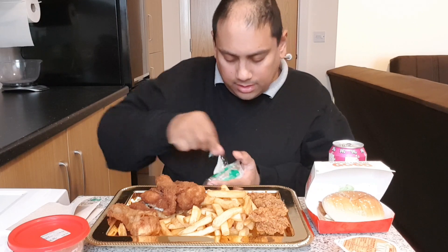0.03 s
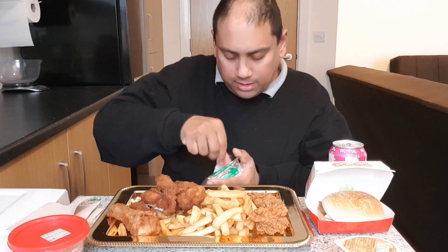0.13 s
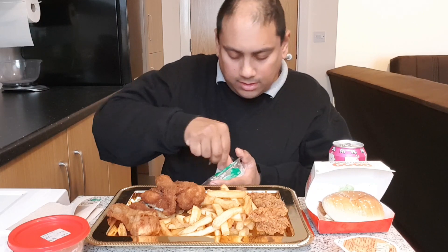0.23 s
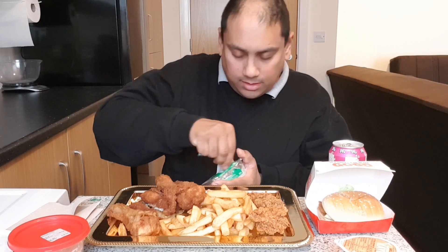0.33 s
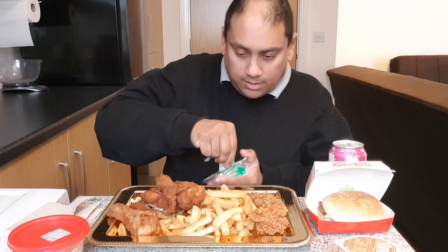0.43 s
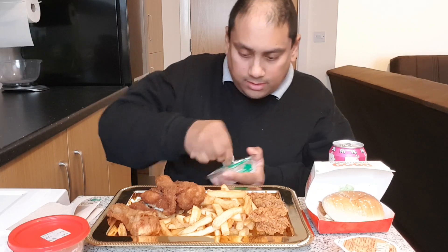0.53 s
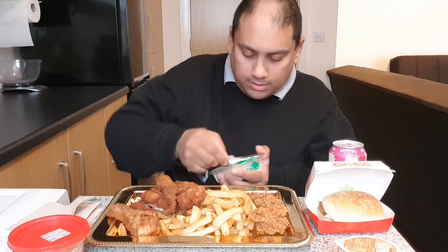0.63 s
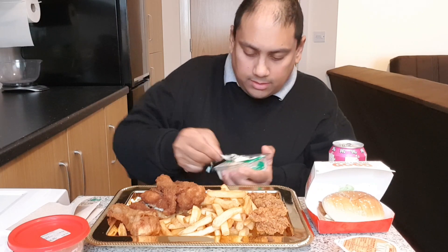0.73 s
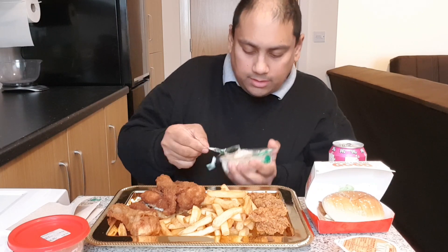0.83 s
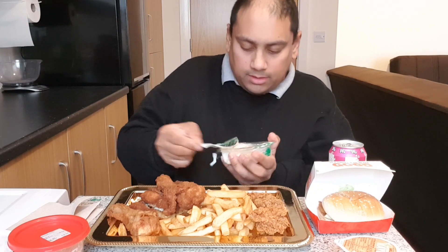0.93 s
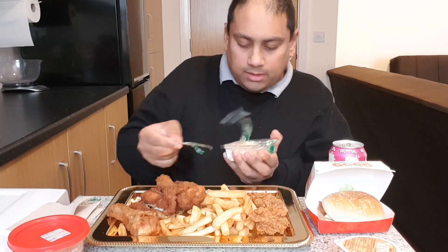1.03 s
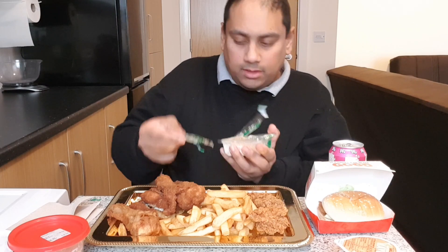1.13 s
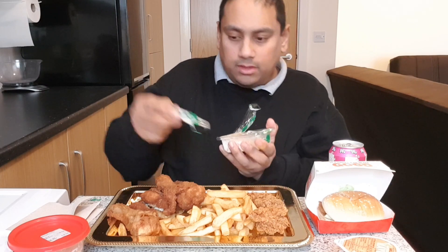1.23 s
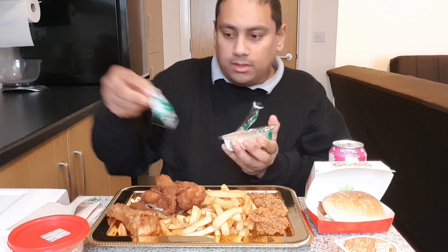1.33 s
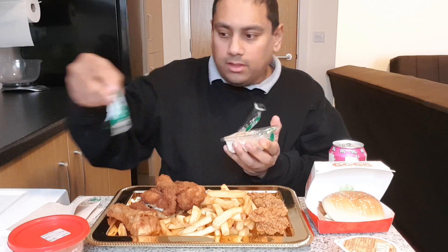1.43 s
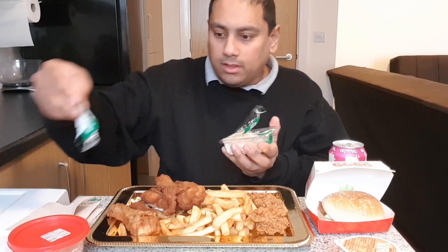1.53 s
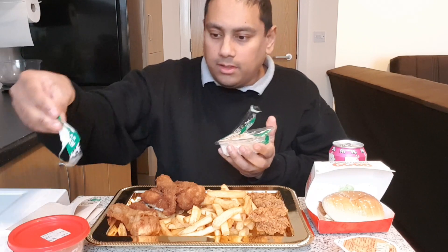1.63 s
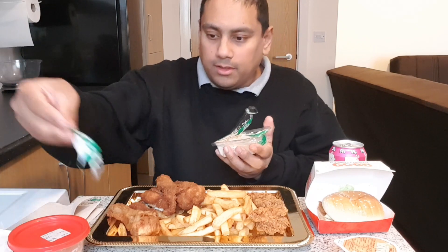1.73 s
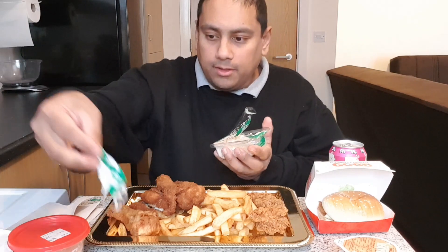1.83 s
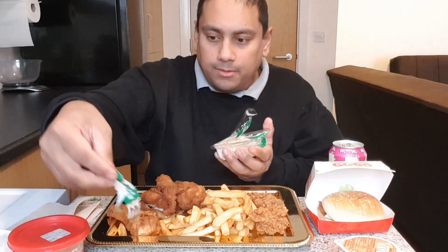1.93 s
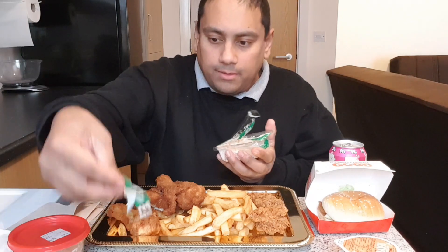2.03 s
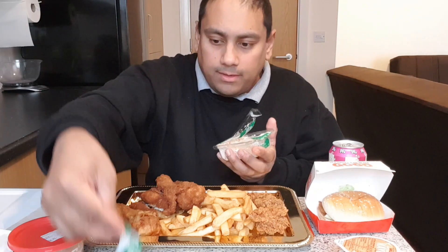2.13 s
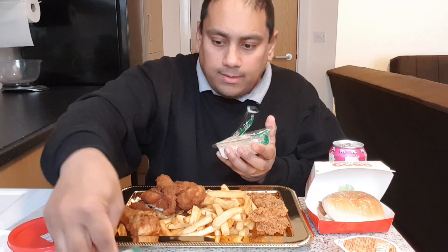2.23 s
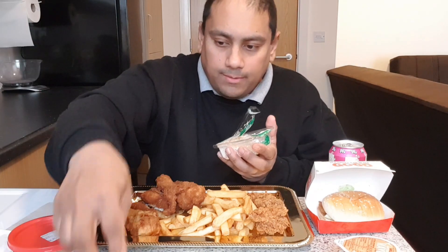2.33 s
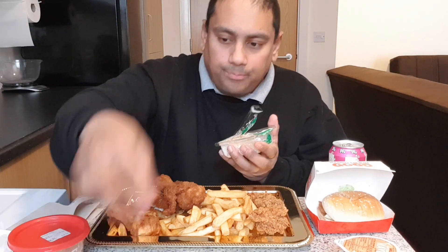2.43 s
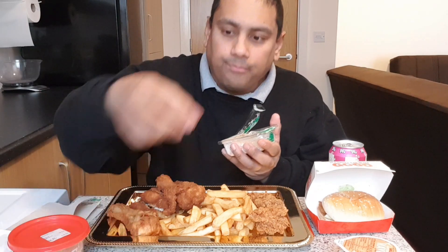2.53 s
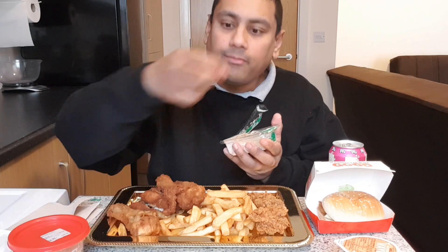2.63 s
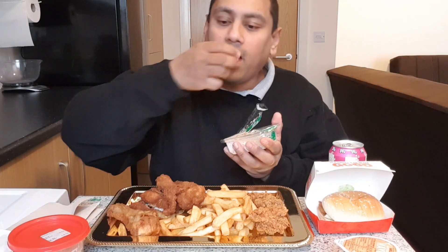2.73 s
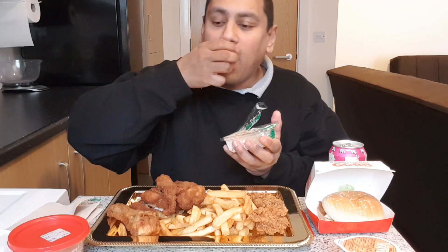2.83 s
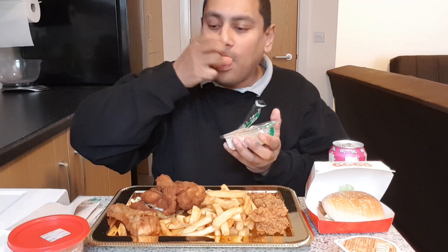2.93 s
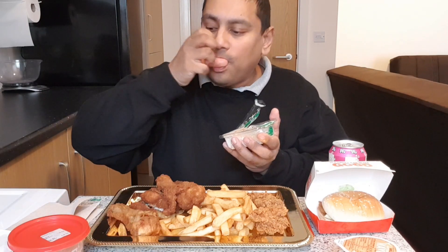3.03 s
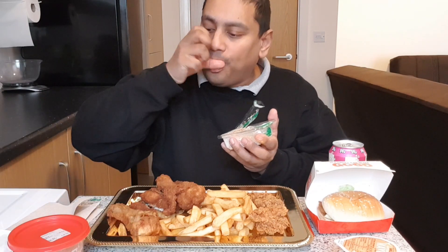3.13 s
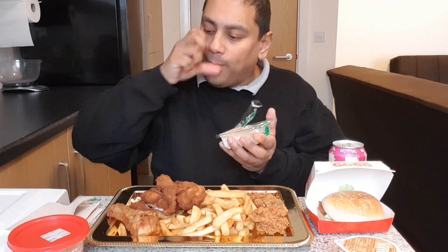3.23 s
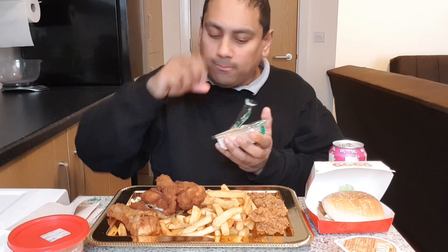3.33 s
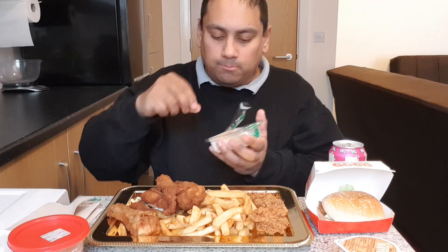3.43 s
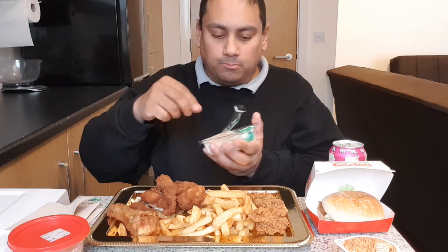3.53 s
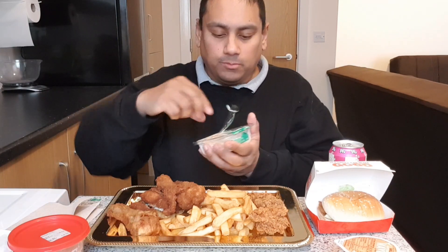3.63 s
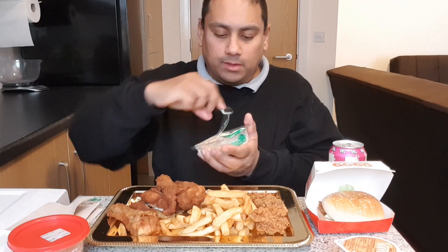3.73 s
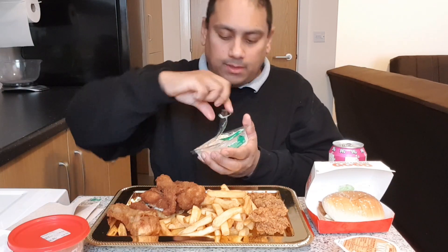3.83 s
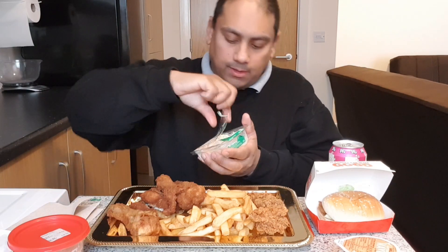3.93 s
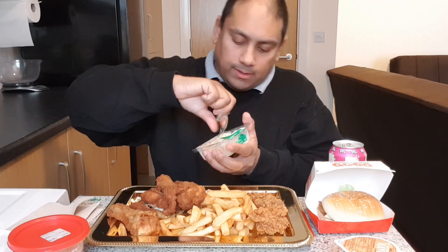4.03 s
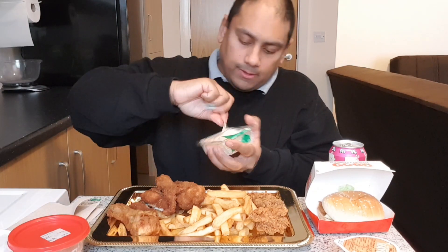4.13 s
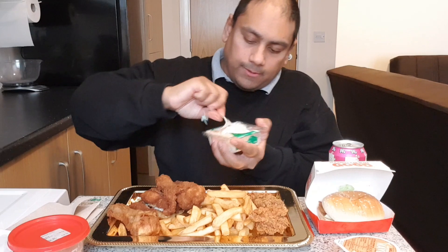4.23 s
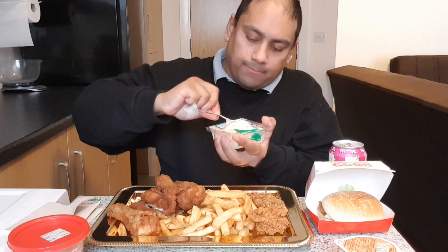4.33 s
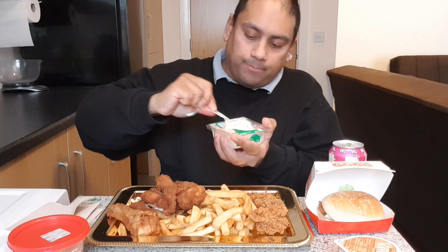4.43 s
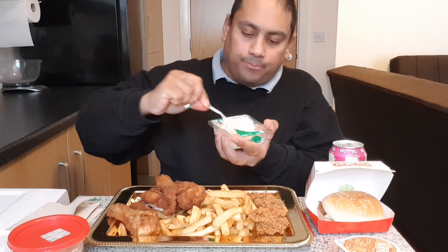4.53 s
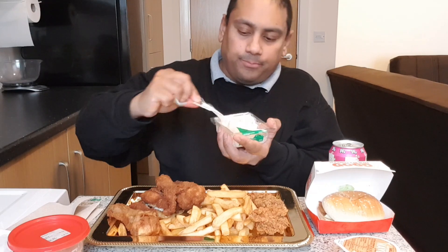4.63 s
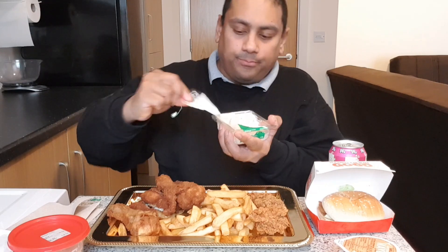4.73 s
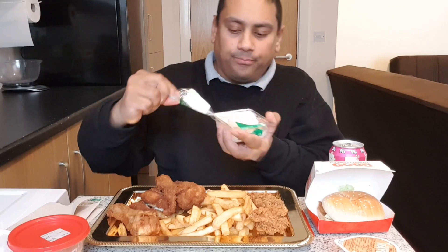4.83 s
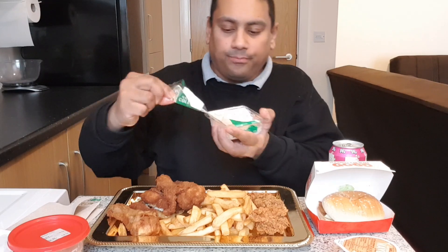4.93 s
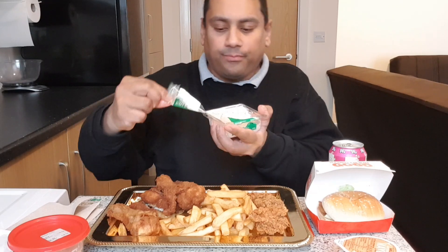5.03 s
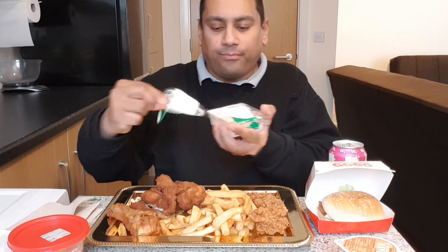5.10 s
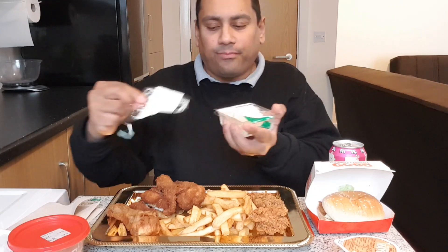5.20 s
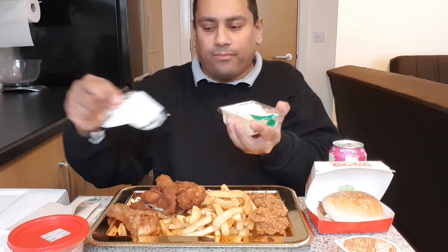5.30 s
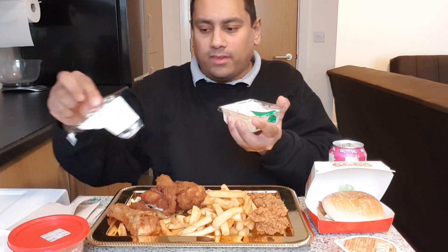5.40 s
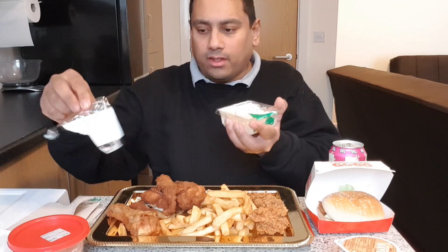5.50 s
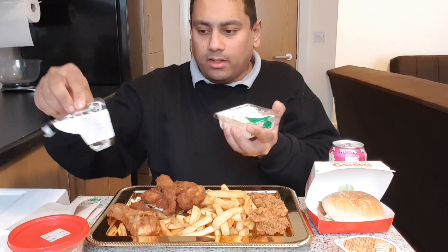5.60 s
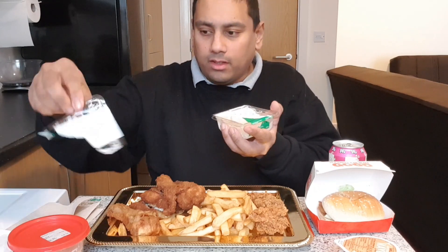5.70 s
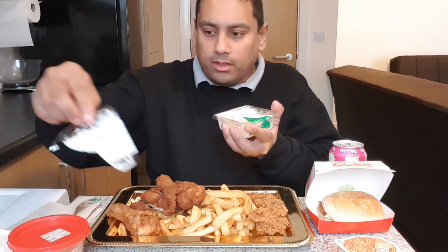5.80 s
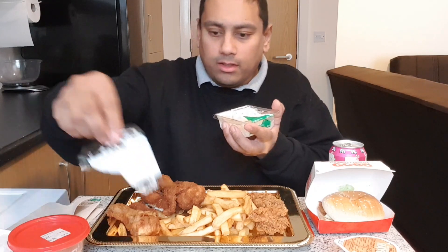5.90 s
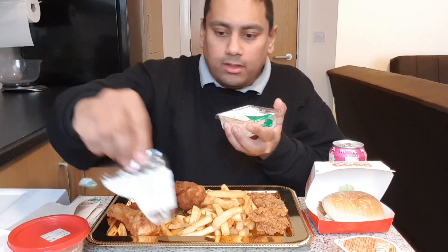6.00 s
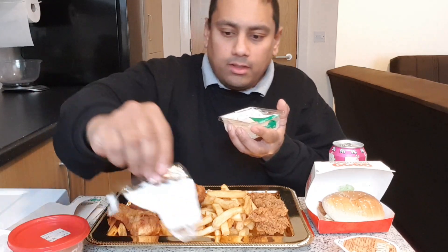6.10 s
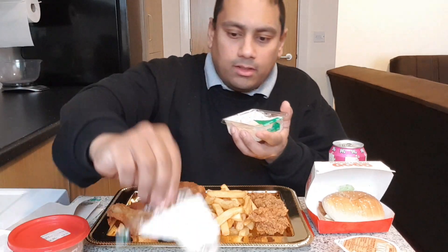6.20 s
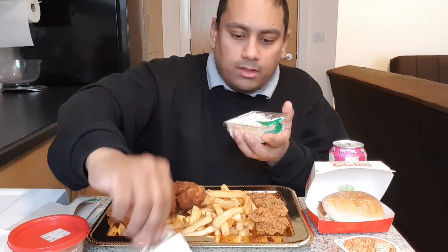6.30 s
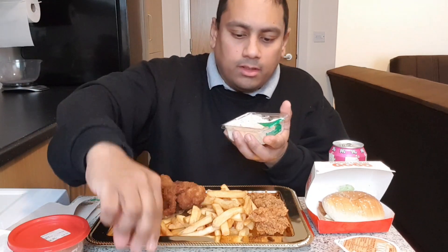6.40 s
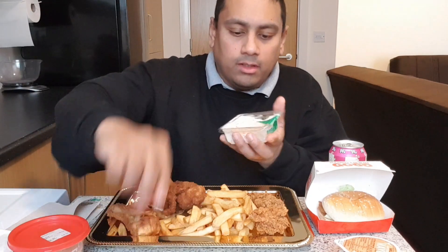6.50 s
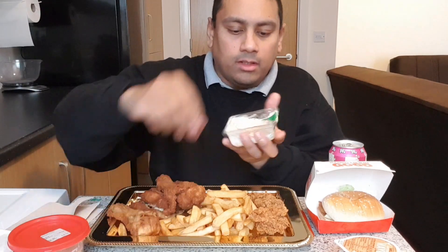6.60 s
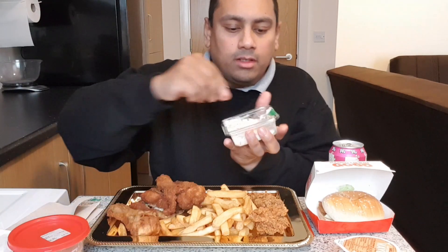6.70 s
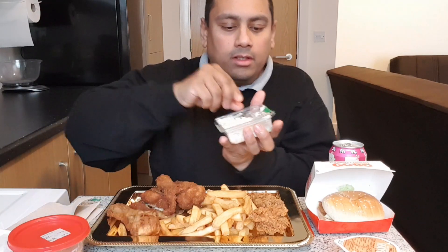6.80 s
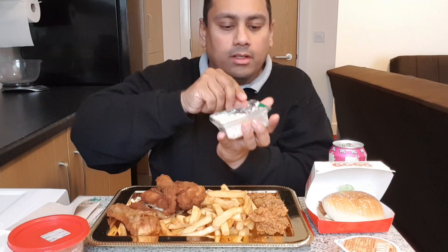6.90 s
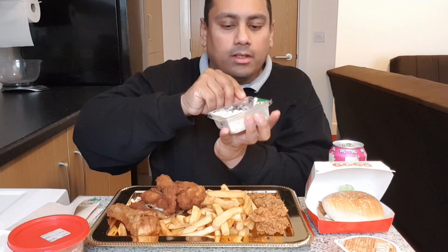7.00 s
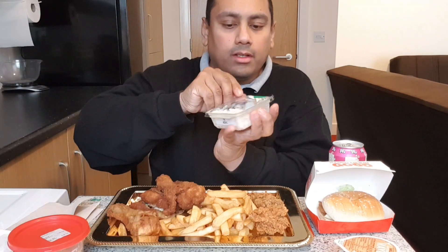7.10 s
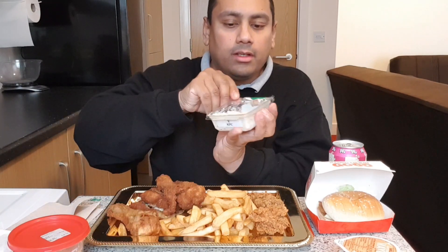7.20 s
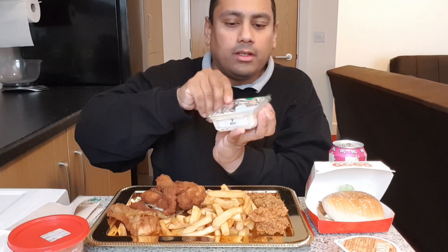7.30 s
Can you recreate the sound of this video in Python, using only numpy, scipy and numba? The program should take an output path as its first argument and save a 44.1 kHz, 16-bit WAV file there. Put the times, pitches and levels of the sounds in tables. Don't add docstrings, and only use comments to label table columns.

```python
import sys
import numpy as np
from scipy import signal
from scipy.fft import rfft, irfft, next_fast_len
from scipy.io import wavfile
from scipy.ndimage import uniform_filter1d
from numba import njit

SR = 44100
rng = np.random.default_rng(int(sys.argv[2]) if len(sys.argv) > 2 else 0)


def undo_db(level):
    steps = np.asarray(level, float) / 20
    return 10 ** steps


def output_pcm(signal):
    pcm = np.clip(np.atleast_2d(signal).T, -1, 1) * 32767
    wavfile.write(sys.argv[1], SR, np.round(pcm).astype(np.int16))


N = 324267

# pitch in Hz, level in dB per Hz.
HUM_COLOUR = [(15, -41.5), (25, -19), (80, -0.5), (108, -11), (141, -3), (161, -16.5), (270, -18),
              (301, -10.5), (405, -21.5), (516, -22), (560, -38.5), (1040, -41.5), (7510, -49),
              (11600, -32), (16000, -39)]
# pitch in Hz, width in Hz, level in dB.
FRIDGE_MODES = [(47.6, 3.44, 2.5), (75.4, 4.8, 2.5), (135.3, 5, -1.5), (190, 22, -5), (295, 1.9, -5),
                (417, 230, -33), (5000, 2500, -35.5)]
# pitch in Hz, likeness from 0 to 1.
HUM_LIKENESS = [(60, 0.98), (130, 0.83), (300, 0.81), (640, 0.6), (1400, 0)]
# time in seconds, rumble above its rest in dB.
THUDS = [(0.1, 4.5), (0.588, 13.5), (0.951, 4.5), (1.21, 5.5), (1.64, 11), (2.292, 11.5), (2.742, 9),
         (3.78, 8.5), (4.89, 15.5), (5.15, 5.5), (6.118, 0.5), (7.19, 4)]
# start in
# seconds, end in seconds, pitch in Hz, width in Hz, level in dB.
SQUEAKS = [(0, .05, 4470, 6040, -65), (1.8, 1.94, 5900, 120, -70), (2.02, 2.17, 5830, 120, -73),
           (2.18, 2.3, 10000, 7000, -62.5), (2.31, 2.41, 2340, 350, -75.5), (2.475, 2.52, 3170, 500, -72),
           (2.46, 2.5, 2380, 500, -73), (2.86, 3.06, 1520, 200, -84), (5.4, 5.505, 11500, 5000, -63),
           (2.4, 2.62, 5520, 5000, -76), (2.645, 2.7, 3600, 893, -79), (5.4, 5.5, 5000, 6040, -64),
           (2.52, 2.67, 12260, 5000, -70.5), (2.79, 2.87, 2400, 400, -73), (2.73, 2.77, 3270, 600, -58),
           (2.8, 2.86, 3200, 600, -74), (2.815, 2.9, 1030, 450, -73), (3.68, 3.74, 9460, 3000, -72),
           (3.77, 3.998, 1480, 160, -78), (6.8, 6.84, 10500, 3990, -70), (6.95, 7.09, 1510, 900, -80),
           (6.98, 7.27, 456, 90, -60), (7.04, 7.09, 4520, 2490, -75), (7.11, 7.19, 1700, 900, -68),
           (7.24, 7.338, 1610, 450, -73), (7.3, 7.33, 11500, 2500, -64)]

# start in seconds, snap level in dB, ring pitch in Hz, ring against the snap in dB.
STRIP_SNAPS = [(0.056, -54.5, 1330, 5), (0.074, -37, 9000, -20), (0.0811, -31.5, 1440, -12.5),
               (0.2803, -37, 1340, -12), (0.524, -33, 1500, 0), (0.5728, -29.5, 1500, 0),
               (0.709, -31.5, 1480, 4.5), (0.717, -34.5, 1510, 1.5), (0.699, -31, 1620, 2),
               (0.939, -41, 1000, -5), (0.955, -23.5, 4700, -27.5), (1.1915, -37, 3200, -17),
               (1.2057, -43, 2920, -14.5), (1.4886, -40, 2920, -21), (1.5955, -41, 2900, -15),
               (1.9645, -30, 3100, -18), (1.474, -33, 2900, -30), (1.5812, -30, 3000, -18),
               (1.661, -36, 2920, -12), (1.7525, -32, 3040, -12), (1.951, -28, 2960, -35),
               (2.6494, -55.5, 3580, -9.5), (2.6798, -44, 12900, 8), (2.7207, -36, 10600, -7),
               (2.727, -42.5, 2330, -2.5), (3.1403, -42.5, 4640, -11)]
# start in seconds, snap level in dB, ring pitch in Hz, ring against the snap in dB.
LID_SNAPS = [(4.0123, -29, 1510, -13.5), (4.1931, -20.5, 6060, -21.5), (4.2244, -31, 1140, 0.5),
             (4.2255, -36, 2700, -2), (4.3002, -22.5, 5000, -9.5), (4.4534, -29, 3510, -10),
             (4.5945, -16, 2640, -12), (4.7444, -33.5, 1740, 8), (4.8686, -25, 3050, -29),
             (5.0103, -49, 11300, 2), (5.2037, -23, 9050, -26), (5.215, -23.5, 2930, -13),
             (5.508, -26, 2670, -16), (5.5125, -31, 11700, -3), (5.5777, -25, 2930, -13.5),
             (3.745, -55, 2800, -12.5), (5.9404, -43.5, 2630, -12), (6.8132, -51.5, 700, -27),
             (7.0997, -42.5, 1997, -10)]
# start in seconds, snap level in dB, ring pitch in Hz, ring against the snap in dB.
SHARP_CRACKS = [(0.3552, -33.5, 1410, 10.5), (0.4024, -31, 1760, -2), (0.4122, -4.5, 1500, -9),
                (2.169, -40, 5700, -1.5), (2.4577, -57, 3200, 6.5), (2.695, -56, 5070, 17.5),
                (2.722, -43, 3286, -9), (4.0278, -20, 6300, -44.5), (4.0766, -27, 2290, -10),
                (4.1425, -27.5, 5810, -10), (4.3712, -21.5, 980, -13.5), (4.408, -12, 3660, -5.5),
                (4.4995, -16, 3700, -4.5), (4.5496, -20, 3480, -4.5), (4.6441, -18, 5500, -13),
                (4.678, -33, 5540, -4), (4.7076, -8.5, 5740, -10.5), (4.9158, -37.5, 3100, 2.5)]
# start in seconds, snap level in dB, ring pitch in Hz, ring against the snap in dB.
LOOSE_CRACKS = [
    (5.0862, -50, 5500, 1),
    (5.1054, -17, 990, -29),
    (5.111, -25, 11500, 0),
    (5.126, -33, 11100, 2),
    (5.2283, -19.5, 2940, -35),
    (5.2988, -21, 2440, -11),
    (5.3118, -19.5, 2340, -25),
    (5.36, -23.5, 2950, -16.5),
    (5.5142, -29, 9050, -8),
    (5.5965, -19.5, 2860, -23),
]
# start in seconds, snap level in dB, ring pitch in Hz, ring against the snap in dB.
DRY_TICKS = [(5.7545, -32.5, 2880, -14), (5.833, -38, 6000, -13), (5.7804, -44, 2680, -3),
             (5.7934, -34.5, 11400, -5), (5.8409, -27.5, 12100, -4.5), (5.8616, -39.5, 2280, 2),
             (5.9545, -29, 1740, -12), (5.9897, -50, 1732, 2), (6.042, -33.5, 6500, -14),
             (6.0515, -43.5, 2850, 0.5), (6.092, -37, 1730, -21), (6.1445, -27, 3120, -13),
             (6.2041, -29, 5860, -12), (6.2301, -29.5, 5200, -5), (6.2527, -43, 6050, -7),
             (6.268, -37.5, 3680, -6), (6.2906, -25.5, 3270, -19), (6.3085, -17, 2530, -23),
             (6.317, -16.5, 2500, -15), (6.3487, -20, 3110, -18), (6.93, -49.5, 1716, -12),
             (7.1558, -30.5, 12000, -3.5), (5.966, -43, 4500, 0), (6.0807, -49.5, 2870, 3)]
# start in seconds, snap level in dB, ring pitch in Hz, ring against the snap in dB.
TAPS = [
    (2.172, -61, 1670, 4.5),
    (2.201, -65, 700, -3),
    (2.203, -63, 380, 8),
    (2.241, -49.5, 790, -2.5),
    (2.245, -60.5, 257, 14),
    (2.801, -59, 1200, 6.5),
]
# start in seconds, snap level in dB, ring pitch in Hz, ring against the snap in dB.
FLICKS = [(4.1492, -24.5, 11000, -3), (4.3695, -21.5, 8500, -4.5), (4.415, -27, 3900, 2.5),
          (4.4265, -31, 3200, 0.5), (4.451, -32, 3000, 1), (4.458, -30.5, 3700, 2), (4.468, -29, 3800, 3),
          (4.506, -27, 3800, 2.5), (4.7446, -23.5, 3350, -3), (4.751, -30.5, 1800, 3),
          (4.725, -26.5, 6900, 4), (4.595, -20, 5500, -3.5), (0.575, -32, 1300, 5), (0.63, -30, 1100, 5),
          (0.64, -27.5, 1500, 3.5), (0.59, -29, 1500, 1), (0.778, -35.5, 450, 6), (0.8, -28, 2200, -10),
          (2.7275, -41, 2700, -3), (2.797, -51, 2350, 7), (2.683, -53, 5200, 0), (2.2415, -40, 5400, -4),
          (6.305, -29.5, 6000, -4), (7.1005, -47.5, 1120, 0.5), (4.232, -32, 1170, -1)]

# pitch in Hz, time to fall 60 dB in seconds, level in dB.
ROOM_BANDS = [(322, 0.41, -17.5), (1000, 0.29, -3), (3040, 0.24, 1.5), (6660, 0.32, 3), (13720, 0.11, 13)]
# start in seconds, end in seconds, pitch in Hz, width in Hz, level in dB.
PATCHES = [(.575, .63, 1100, 250, -43), (.62, .7, 1590, 150, -46), (.73, .83, 1030, 248, -42.5),
           (.74, .86, 2150, 710, -44), (.77, .8, 444, 91.6, -45.5), (.76, .9, 12300, 5000, -67),
           (.935, 1.0, 476, 110, -50), (.97, 1.08, 11700, 5000, -51), (.06, .2, 1230, 598, -62.5),
           (.41, .46, 2904, 1503, -46.5), (.412, .44, 446, 120, -42), (.52, .57, 1510, 250, -49),
           (.93, 1.03, 1100, 700, -49), (.93, .96, 3500, 3000, -49), (2.2, 2.3, 496, 600, -70),
           (.42, .5, 635, 249.4, -62), (.58, .7, 655, 249, -52), (1.2, 1.25, 2940, 220, -60.5),
           (1.485, 1.525, 2900, 350, -54.5), (1.585, 1.625, 2920, 350, -54), (1.67, 1.73, 2650, 300, -56.5),
           (1.76, 1.8, 2850, 350, -56), (1.955, 2.05, 3070, 200, -66), (2.728, 2.775, 2300, 900, -55),
           (5.205, 5.27, 2900, 301, -55), (4.225, 4.29, 1070, 303, -57), (4.31, 4.345, 4750, 894, -43.5),
           (4.32, 4.4, 1000, 251, -52), (4.42, 4.435, 3120, 696, -51), (4.45, 4.475, 3520, 704, -44),
           (4.43, 4.48, 1610, 496, -50.5), (4.5, 4.54, 3790, 500, -41.5), (4.6, 4.64, 2700, 700, -51),
           (4.75, 4.81, 1610, 602, -54), (4.87, 4.96, 2920, 500, -60), (5.62, 5.78, 2780, 350, -66.5),
           (5.72, 5.76, 1320, 300, -66), (5.95, 6.0, 2960, 1500, -60.5), (5.99, 6.11, 1700, 300, -70),
           (6.04, 6.1, 2850, 400, -77)]

# full pull reached
# in seconds, held in seconds, film rustle in dB, fade in dB per second, strain on the tub wall against the
# rustle in dB.
STRIP_TUGS = [(0.103, 0.0056, -46.5, 130, 12), (0.3, 0.014, -65.5, 130.5, 12),
              (0.368, 0.002, -40.5, 606, -2), (0.424, 0.0018, -33, 268.5, -14),
              (0.53, 0.076, -43.5, 98, -9), (0.6, 0.068, -42, 200, 18.5), (0.721, 0.045, -35.5, 140, 8.5),
              (0.778, 0.031, -35, 263, 11), (0.956, 0.037, -36.5, 195, -25), (1.209, 0.004, -61, 128, -16),
              (1.491, 0.0056, -48.5, 244, -2), (1.599, 0.0055, -52.5, 204, 6.5),
              (1.679, 0.0094, -47, 203, -4), (1.768, 0.0056, -52, 186, 5), (1.962, 0.005, -47, 204, 2),
              (2.18, 0.039, -62.5, 132, -27), (2.74, 0.004, -64, 137, -32), (2.83, 0.0091, -88, 137, 13),
              (3.154, 0.004, -52, 204.5, 2.5)]
# full pull reached in seconds, held in seconds, film rustle in dB,
# fade in dB per second, strain on the tub wall against the rustle in dB.
LID_TUGS = [(4.035, 0.0035, -44, 106, -8), (4.12, 0.1, -49, 100, 8.5), (4.236, 0.0026, -39, 300, -12),
            (4.32, 0.004, -38.5, 122, -10), (4.418, 0.004, -35, 125, 6), (4.46, 0.0091, -42, 150, -5),
            (4.51, 0.055, -38, 119.5, -2), (4.599, 0.0032, -37.5, 148.7, -6), (4.655, 0.028, -42.5, 150, 7),
            (4.715, 0.004, -36.5, 199.5, 0), (4.747, 0.0017, -32, 190, 4.5), (4.88, 0.03, -45.5, 190, -4),
            (5.12, 0.0033, -35, 387, 6), (5.22, 0.066, -52.5, 127, 11), (5.527, 0.0025, -47, 300, 2),
            (5.591, 0.0033, -40, 293, -1), (5.64, 0.004, -61, 140, -9), (5.72, 0.36, -65.5, 100, 3),
            (6.24, 0.08, -55.5, 108, 5), (6.317, 0.0025, -43, 212, -30), (6.951, 0.23, -82, 59.6, -14.5),
            (7.114, 0.0022, -53.5, 247, 11), (7.249, 0.006, -65, 123, -1)]
# start in seconds, stretched film ring against the rustle in dB, tub air against the rustle in dB.
HOLDS = [(0, 3.5, -6.5), (0.345, 7, -1.1), (0.48, 0, -5.5), (0.9, -2.5, -8.5), (1.07, 4, -13.5),
         (2.12, -23, -11), (2.7, -2, -14), (3, -23.5, -23), (3.95, -6.5, -16), (4.36, 14, -15.5),
         (4.48, 12.5, -17.5), (4.63, -0.5, -17.5), (4.73, 10.5, -14), (5.06, 3.5, -22), (5.65, 1, -2),
         (6.2, -6, -37), (6.85, -23.5, 15), (7.09, -23, 1)]
# time in seconds, pitch in Hz.
FILM_PITCH = [(0, 2860), (1.19, 3040), (1.4, 2765), (1.48, 2920), (1.9, 2737), (1.95, 3020), (2.2, 2990),
              (2.35, 2400), (2.75, 2464), (4, 2740), (4.4, 3390), (4.58, 3770), (4.72, 3800), (4.76, 2380),
              (4.88, 2850), (7.4, 3065)]
# time in seconds, pitch in Hz.
WALL_PITCH = [(0, 1270), (.55, 1402), (.66, 1700), (.85, 1290), (1.1, 1030), (2.85, 1032), (4.2, 999),
              (5.3, 1000), (7.4, 1500)]
# pitch in Hz, level in dB.
FILM_COLOUR = [(300, -37.5), (800, -10.5), (1500, -5), (3000, -4), (5500, 0.5), (7000, -4), (11500, 0),
               (16000, -7.5)]
# start in seconds, end in seconds, share from 0 to 1.
DANGLES = [
    (1.154, 2.152, 1),
    (4.386, 4.85, 0.29),
    (5.16, 5.4, 0.38),
    (5.564, 6.002, 0.6),
]
# pitch in Hz, left minus right in dB.
MIC_LEAN = [(60, -3), (110, 1), (200, 1.5), (380, 0.5), (700, 4), (1290, 0), (2380, 3), (4400, -1.5),
            (8120, 0), (15000, 1)]


def colour(x, points):
    hz, db = np.transpose(points)
    size = next_fast_len(x.shape[-1])
    log_hz = np.log(np.arange(size // 2 + 1) * SR / size + 1)
    gain = undo_db(np.interp(log_hz, np.log(hz), db))
    return irfft(rfft(x, size) * gain, size)[..., :x.shape[-1]]


def unit(x):
    return x / np.sqrt(np.mean(x ** 2))


def along(table):
    s, value = np.transpose(table)
    return np.interp(np.arange(N) / SR, s, value)


def span(a, b, edge_s):
    return np.interp(np.arange(N) / SR, [a - edge_s, a + edge_s, b - edge_s, b + edge_s], [0, 1, 1, 0])


def walk(rate):
    k = int(SR / rate)
    steps = np.repeat(rng.standard_normal(N // k + 1), k)
    return unit(uniform_filter1d(uniform_filter1d(steps, k), k)[:N])


@njit
def svf(x, hz, width):
    y, band, low = np.empty(len(x)), 0., 0.
    for i in range(len(x)):
        g, k = np.tan(np.pi * hz[i] / SR), width / hz[i]
        v = (band + g * (x[i] - low)) / (1 + g * (g + k))
        band, low, y[i] = 2 * v - band, low + 2 * g * v, k * v
    return y


def ring(x, hz, width_hz):
    return np.array([svf(side, hz + np.zeros(len(side)), 1. * width_hz) for side in x])


def double_ring(x, hz, width_hz):
    return ring(ring(x, hz, width_hz), hz, width_hz)


def ticks(size, rate, spread_db):
    happens, sign, strength, spot = rng.random((size, 4)).T
    size_db = np.minimum(-spread_db * np.log(1 - strength), 12.)
    left = (happens < rate / SR) * np.sign(sign - .5) * undo_db(size_db)
    shift = np.round(9 * (spot - .5)).astype(int)
    place = np.clip(np.arange(size) + shift, 0, size - 1)
    return np.array([left, np.bincount(place, left, size)])


def stick_slip_rings(table, rate, spread_db, edge_s):
    rub, out = ticks(N, rate, spread_db) * undo_db(2.0 * walk(30)), np.zeros((2, N))
    drift = 1 + .015 * walk(12)
    for a, b, hz, width, db in table:
        part = slice(max(int((a - edge_s) * SR), 0), int((b + edge_s) * SR))
        gone = np.linspace(-.5, .5, len(drift[part]))
        pitch = hz * drift[part] * (1 - 0.031 * gone)
        tone = unit(double_ring(rub[:, part], pitch, width))
        out[:, part] += undo_db(db - 4 * gone) * span(a, b, edge_s)[part] * tone
    return out


def fridge_and_hiss():
    noise = rng.standard_normal((2, N))
    modes = sum(undo_db(db) * unit(double_ring(noise, hz, 2 * width)) for hz, width, db in FRIDGE_MODES)
    mid, side = undo_db(-2.0) * unit(colour(noise[:, ::-1], HUM_COLOUR)) + undo_db(-2.5) * unit(modes)
    mid = colour(mid, [(hz, 10 * np.log10(1 + np.clip(c, 0, .99))) for hz, c in HUM_LIKENESS])
    side = colour(side, [(hz, 10 * np.log10(1 - np.clip(c, 0, .99))) for hz, c in HUM_LIKENESS])
    t, rise_s, fall_s = np.arange(N) / SR, 0.13, 0.077
    thud_db = sum(db * np.exp(np.minimum((t - s) / rise_s, (s - t) / fall_s)) for s, db in THUDS)
    mid = mid + (undo_db(thud_db - 4.5) - 1) * colour(mid, [(90, -7.0), (160, -12.0)])
    mid = mid * undo_db(0.6 * walk(3.01))
    return undo_db(-54.5) * np.array([mid + side, mid - side]) / mid.std()


def finger_squeaks():
    return stick_slip_rings(SQUEAKS, rate=1400, spread_db=2.0, edge_s=0.025)


def snaps():
    length, settle_s, bounce_s = 4096, 0.0069, 0.001
    direct, thrown, t = np.zeros((2, N + length)), np.zeros(N + length), np.arange(length) / SR
    treble = signal.butter(N=2, Wn=2500, btype="high", fs=SR, output="sos")
    # rows, (thrown at the walls, after-crackle), both in dB against the snap
    kinds = [(STRIP_SNAPS, (8.9, -9)), (LID_SNAPS, (6, -11)), (SHARP_CRACKS, (-1.5, -13)),
             (LOOSE_CRACKS, (-0.4, -13)), (DRY_TICKS, (-2, -17.5)), (TAPS, (1.4, -9.5)),
             (FLICKS, (-4.5, -17.5))]
    for rows, (wall_db, settle_db) in kinds:
        for s, db, hz, ring_db in rows:
            push = undo_db(settle_db) * ticks(length, rate=4000, spread_db=10.0) * np.exp(-t / settle_s)
            lag, side_db = rng.integers(2, 7), 1.6 * rng.standard_normal()
            push[[0, 1], [lag, 4]] += 1
            bounce = rng.integers(8, 130, (2, 10))
            flips = np.resize([1, -1, -1], bounce.shape[1])
            push[[[0], [1]], bounce] += undo_db(-2) * np.exp(-bounce / (bounce_s * SR)) * flips
            bright = signal.sosfilt(treble, push)
            tone = ring(push, hz, hz / 5)
            x = undo_db(db + 0.5) * (bright + undo_db(ring_db) * tone / np.max(np.abs(tone)))
            start = int(s * SR) + 12
            direct[:, start:start + length] += undo_db(side_db * np.array([[.5], [-.5]])) * x
            thrown[start:start + length] += undo_db(wall_db) * x[0]
    return direct[:, :N], thrown[:N]


def kitchen(x):
    t, echoes, gap_s = np.arange(SR // 2) / SR, 0, 0.0066
    for hz, t60, db in ROOM_BANDS:
        noise = rng.standard_normal((2, len(t)))
        noise[1] += max(500 / hz - .3, 0) * noise[0]
        band = colour(noise, [(hz / 4, -30), (hz / 1.92, -3), (hz, 0), (hz * 2.3, -3), (hz * 4, -30)])
        band = band / band.std(axis=1, keepdims=True) * np.sqrt(hz)
        echoes = echoes + undo_db(db - 60 * t / t60) * band
    echoes = echoes * np.clip(t / gap_s - .5, 0, 1)
    echoes = colour(echoes, [(300, 10.5), (16000, -12)])
    echoes = echoes / np.sqrt(np.sum(echoes ** 2) / 2)
    return undo_db(-3) * signal.fftconvolve(x[None], echoes, axes=1)[:, :N]


def ringing_patches():
    return stick_slip_rings(PATCHES, rate=1500, spread_db=6.5, edge_s=.008)


def tugs():
    rise_db_s, rest_db = 946.5, -92.5
    t, rustle, strain = np.arange(0, N, 32) / SR, undo_db(2 * rest_db), undo_db(2 * rest_db)
    for s, held, db, fade, wall_db in STRIP_TUGS + LID_TUGS:
        swell = rise_db_s * np.maximum(s - t, 0)
        sink = fade * np.maximum(t - s - held, 0)
        power = undo_db(2 * (db - swell - sink))
        rustle, strain = rustle + power, strain + power * undo_db(2 * wall_db)
    return [np.repeat(np.sqrt(p), 32)[:N] for p in (rustle, strain)]


def peel():
    rustle, strain = tugs()
    s, ring_db, air_db = np.transpose(HOLDS)
    hold = np.clip(np.searchsorted(s, np.arange(N) / SR) - 1, 0, None)
    ring_db, air_db = (uniform_filter1d(db[hold], size=1024) for db in (ring_db, air_db))
    seam = ticks(N, rate=6000, spread_db=9.0) * undo_db(2.0 * walk(70))
    film = undo_db(4.0) * unit(colour(seam, FILM_COLOUR))
    taut = undo_db(ring_db - 16.5) * unit(ring(seam, along(FILM_PITCH), 600.))
    wall = undo_db(-16.0) * unit(ring(seam, along(WALL_PITCH), 260.0))
    air = undo_db(-3.0 + 2.5 * walk(25)) * unit(double_ring(seam, 450, 143))
    floor = undo_db(-8.5) * unit(double_ring(seam, 320.0, 160.0))
    floor = floor + undo_db(-6.5) * unit(ring(seam, 629.0, 470.0))
    air_drive = np.hypot(rustle * undo_db(air_db), undo_db(-72.5))
    return undo_db(-3.5) * (rustle * (film + taut) + strain * wall + air_drive * (air + floor))


def dangling(x):
    share = np.clip(sum(c * span(a, b, 0.018) for a, b, c in DANGLES), 0, 1)
    t, pulls = np.arange(N) / SR, np.array([0] + [row[0] for row in STRIP_TUGS + LID_TUGS])
    since_pull = t - pulls[np.searchsorted(pulls, t, side="right") - 1]
    slack = 1.0 * np.clip(since_pull, 0, .08)
    skin_hz = along(FILM_PITCH) * (1.03 - uniform_filter1d(slack, size=256))
    x = x + share * (1.3 * double_ring(x, skin_hz, 300.0) + .8 * ring(x, 6150, 500))
    for hz, width, depth in ((2250, 900, .97), (6950, 770, 0.654)):
        x = x - share * depth * ring(x, hz, width)
    return x


def scene():
    (direct, thrown), seam = snaps(), peel()
    left, right, walls = dangling(np.vstack([direct + seam, thrown + seam[0]]))
    patches = ringing_patches()
    squeaks = finger_squeaks()
    echoes = kitchen(walls + 0.65 * patches[0])
    return np.array([left, right]) + patches + echoes + fridge_and_hiss() + squeaks


def band_limit(x):
    return signal.sosfilt(signal.butter(12, 16990, fs=SR, output="sos"), x)


def record(dry):
    x = np.array([colour(dry[k], [(hz, db * (.5 - k)) for hz, db in MIC_LEAN]) for k in (0, 1)])
    x = signal.sosfilt(signal.butter(N=3, Wn=38, btype="high", fs=SR, output="sos"), x)
    x = signal.sosfilt(signal.ellip(8, .2, 60, 15780, fs=SR, output="sos"), x)
    return band_limit(x)


dry = scene()
out = record(dry)
output_pcm(out)
```